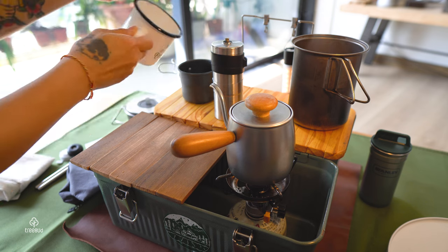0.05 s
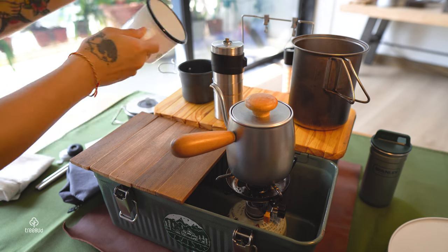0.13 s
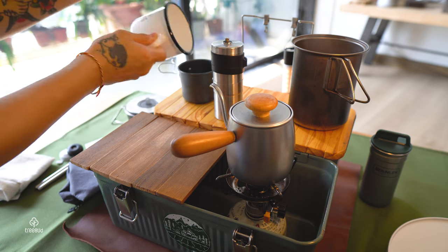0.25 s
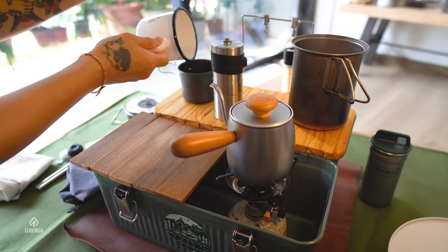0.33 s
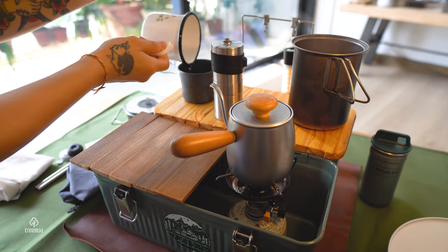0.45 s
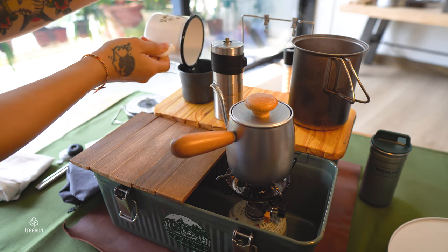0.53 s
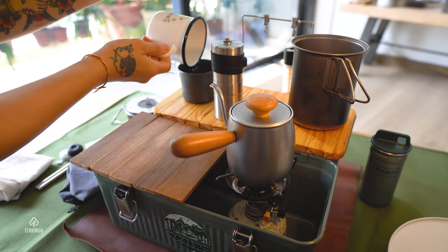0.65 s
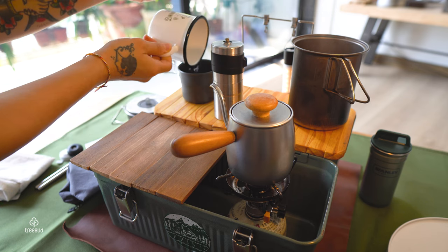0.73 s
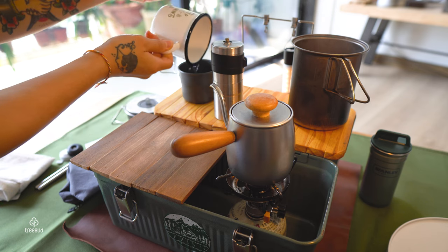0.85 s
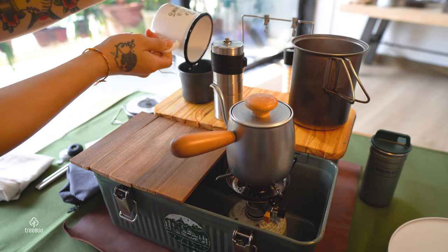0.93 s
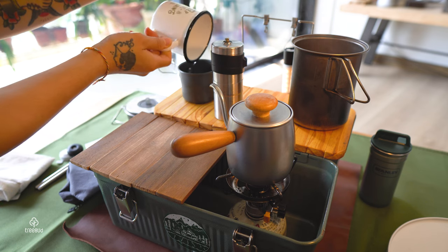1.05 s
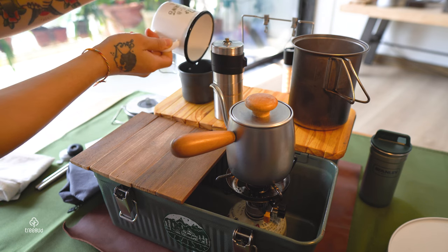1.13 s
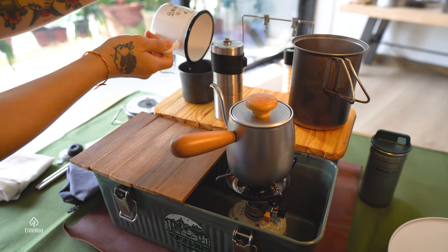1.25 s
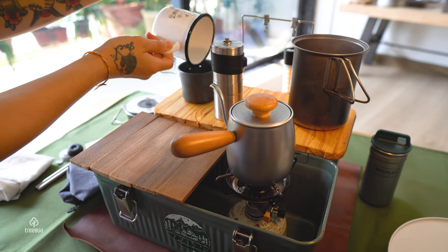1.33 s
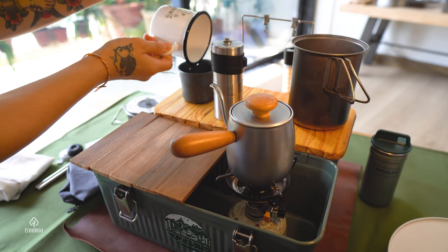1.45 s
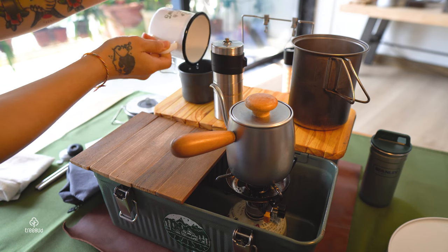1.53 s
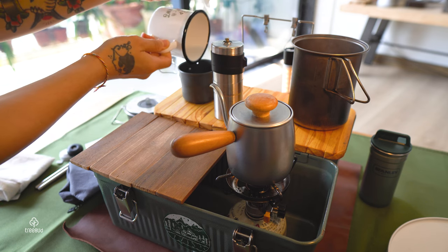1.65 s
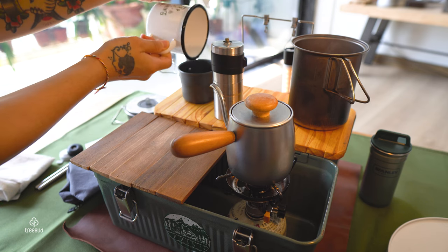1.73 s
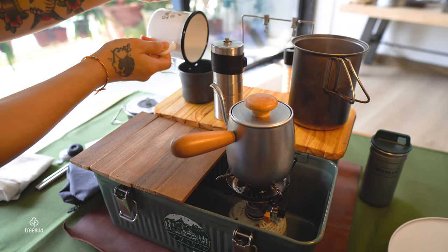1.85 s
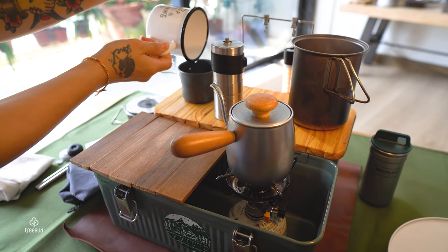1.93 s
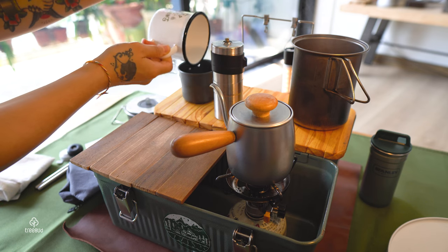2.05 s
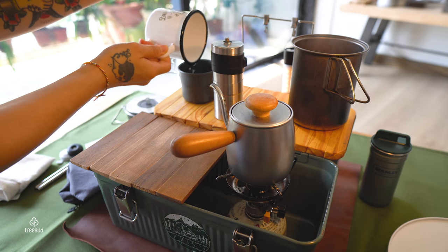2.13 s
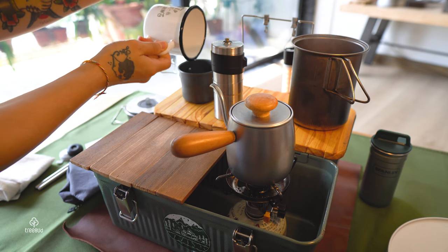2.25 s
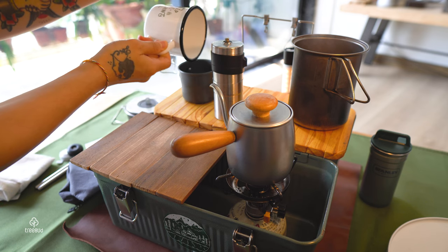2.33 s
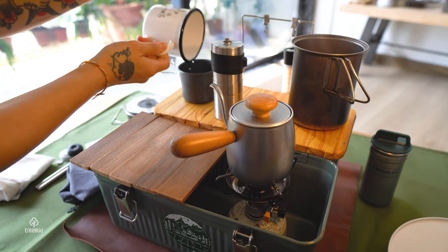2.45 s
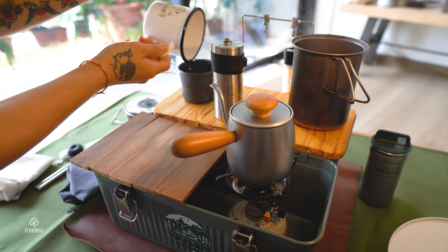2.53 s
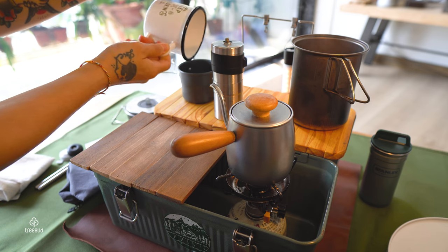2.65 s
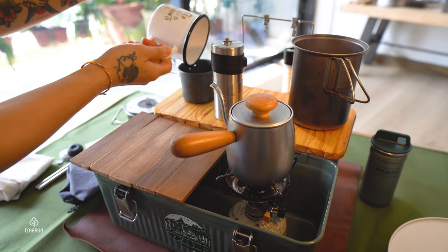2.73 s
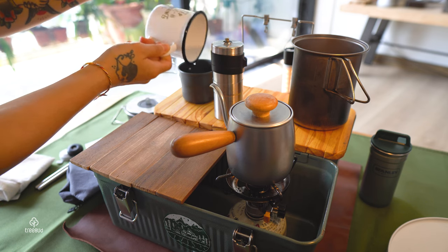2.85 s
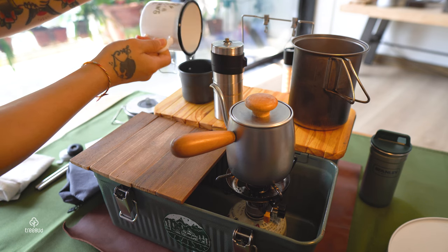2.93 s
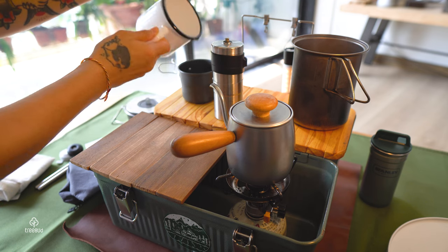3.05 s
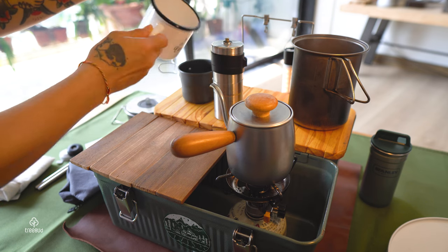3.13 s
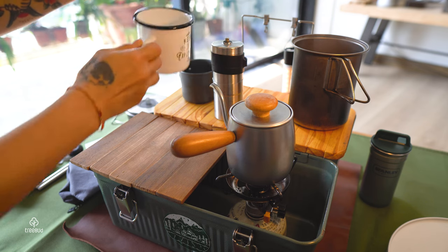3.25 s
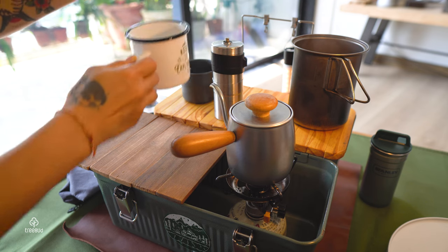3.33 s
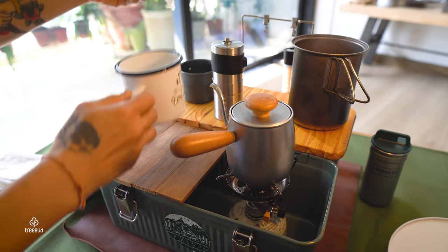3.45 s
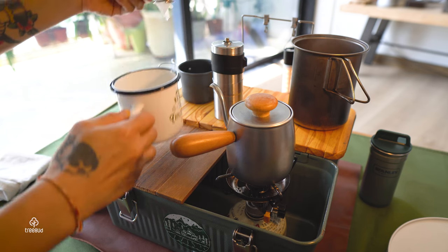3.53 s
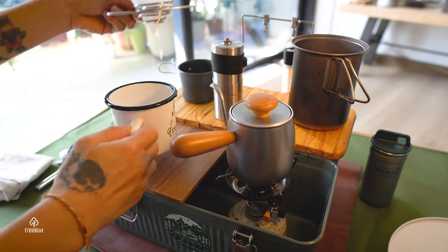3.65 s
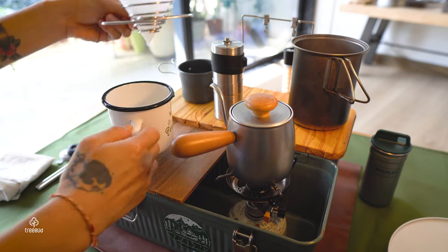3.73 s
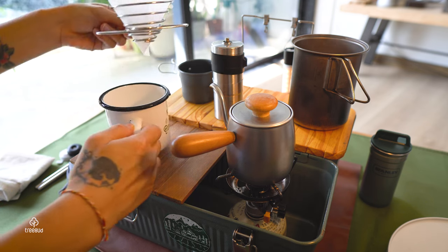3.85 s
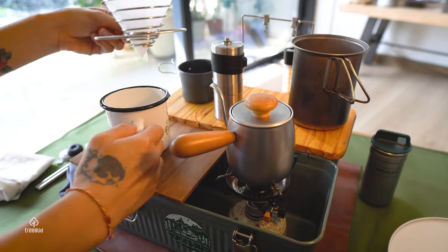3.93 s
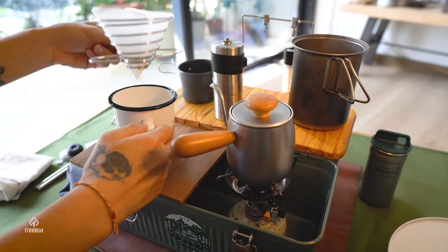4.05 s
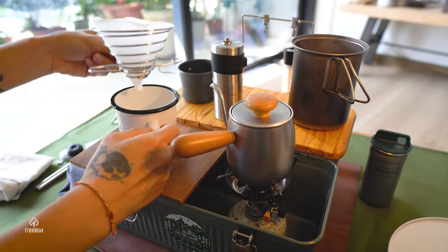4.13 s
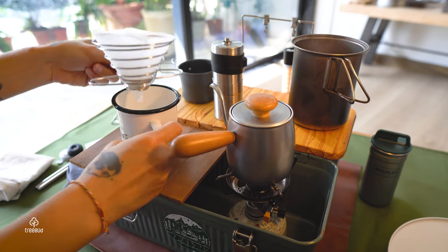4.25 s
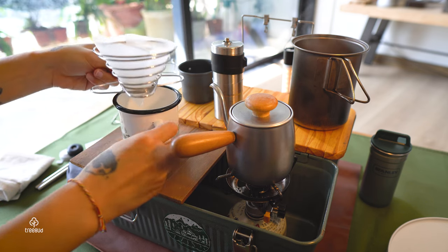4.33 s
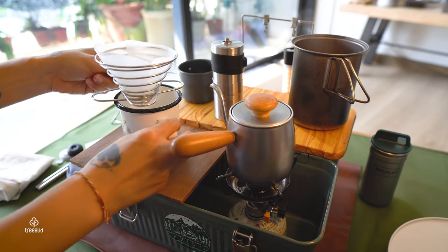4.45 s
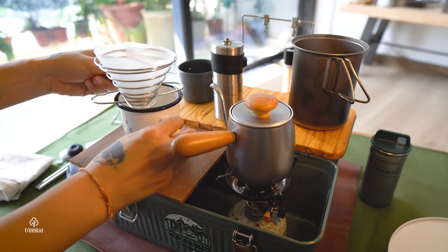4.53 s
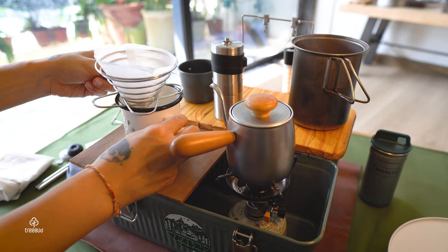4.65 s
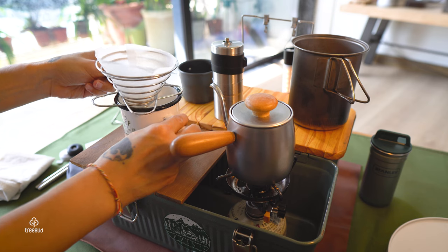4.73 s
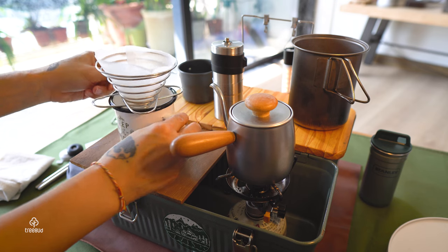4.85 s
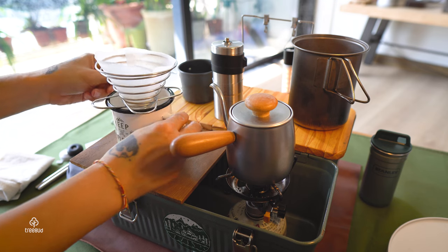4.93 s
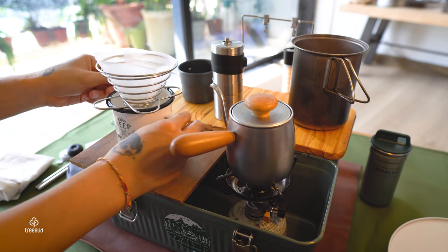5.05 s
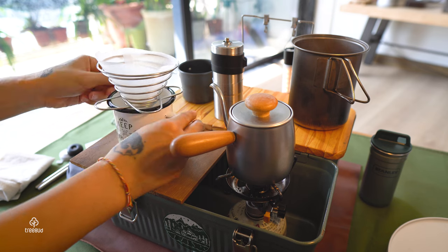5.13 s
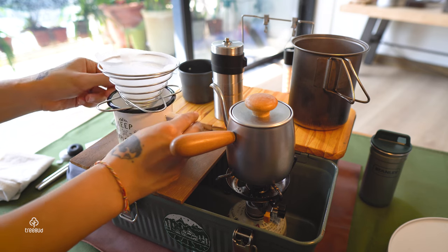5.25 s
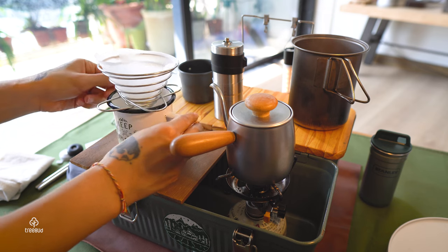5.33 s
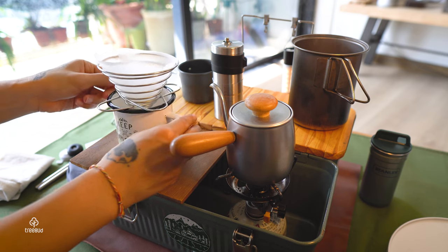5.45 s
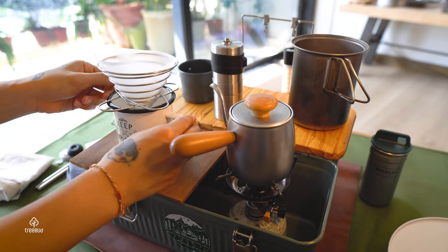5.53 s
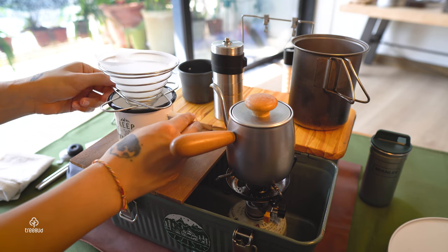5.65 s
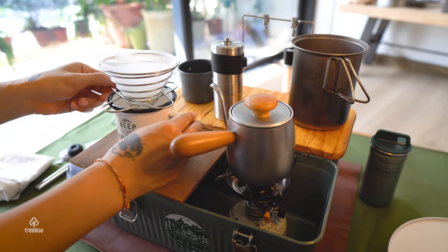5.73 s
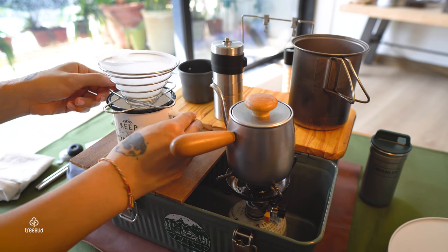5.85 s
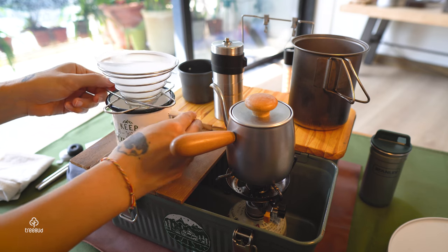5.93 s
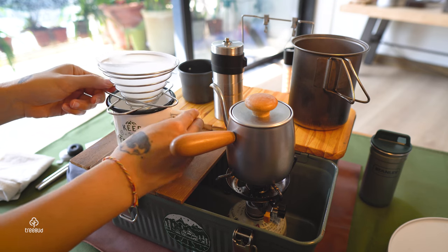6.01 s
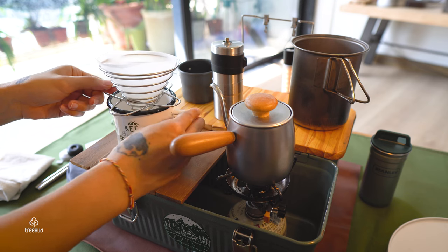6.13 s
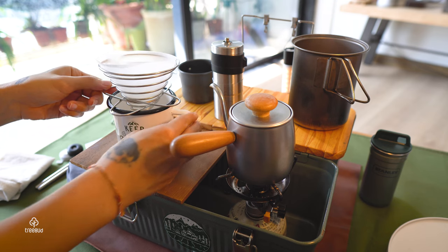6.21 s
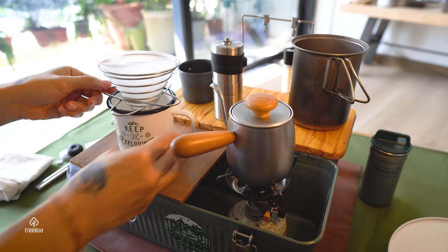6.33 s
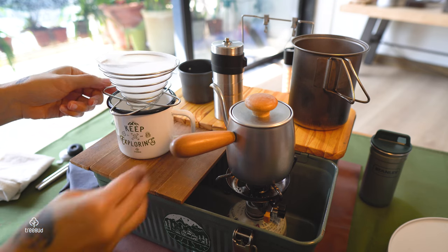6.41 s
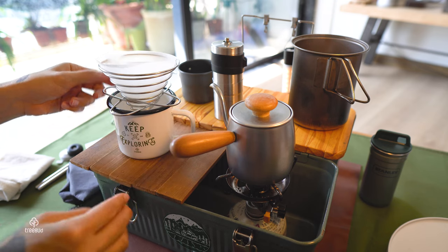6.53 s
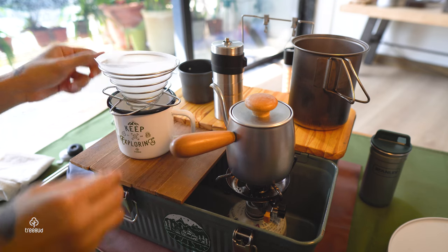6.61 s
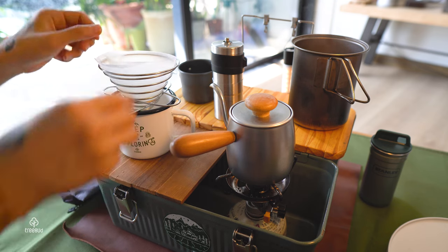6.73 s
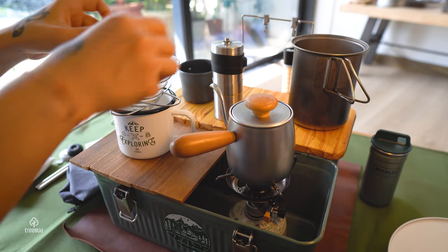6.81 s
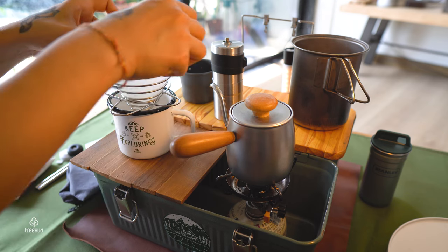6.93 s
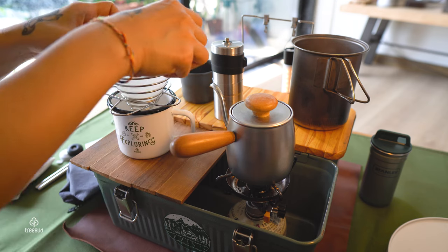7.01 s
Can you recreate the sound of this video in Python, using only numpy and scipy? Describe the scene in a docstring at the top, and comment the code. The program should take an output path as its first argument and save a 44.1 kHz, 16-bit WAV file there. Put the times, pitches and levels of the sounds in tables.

```python
"""A small, humming room: a gas burner murmurs under a pot while an enamel mug is tipped over a cup.
The rim clinks and the last drops fall out; the mug is set on the wooden lid of a steel box in two knocks,
then a wire dripper rattles into place on it. Struck bodies are sums of decaying modes over a noise wash;
drops, rubs, squeak and burner are coloured noise, bumps are low sines and the hum is resonant noise.
Near reflections and a diffuse tail place all but the background in the room."""
import sys
import numpy as np
from scipy import signal
from scipy.fft import rfft, irfft
from scipy.io import wavfile
from scipy.ndimage import uniform_filter1d

SR = 44100
rng = np.random.default_rng(int(sys.argv[2]) if len(sys.argv) > 2 else 0)


def file_out(sig):
    """Save sig as 16-bit WAV at sys.argv[1]."""
    # one column per channel
    cols = np.atleast_2d(sig).T
    # limit, then scale
    lim = np.clip(cols, -1, 1)
    pcm = np.round(lim * 32767).astype(np.int16)
    wavfile.write(sys.argv[1], SR, pcm)


N = 312228
TIME = np.arange(N) / SR
RING = np.arange(int(.6 * SR)) / SR  # time axis of one short sound [s]


def from_db(db):
    """Decibels to gain."""
    return 10 ** (np.asarray(db) / 20)


def rms_one(x):
    """Scale to unit rms."""
    return x / np.sqrt(np.mean(x ** 2) + 1e-20)


def at_hz(points, hz):
    """Read a table on a log-frequency axis."""
    f, value = np.transpose(points)
    return np.interp(np.log(np.maximum(hz, 1)), np.log(f), value)


def fade(t60):
    """Exponential decay that falls 60 dB in t60 seconds."""
    return np.exp(-np.log(1000) * RING / t60)


def bins(size):
    """Frequencies of a real FFT [Hz]."""
    return np.arange(size // 2 + 1) * SR / size


def noise(spectrum, size):
    """Random-phase noise of the given colour, rms 1."""
    phase = np.exp(2j * np.pi * rng.random(size // 2 + 1))
    magnitude = from_db(at_hz(spectrum, bins(size)))
    return rms_one(irfft(phase * magnitude, size))


def add(out, s, sound):
    """Mix a sound in from time s."""
    i = int(round(s * SR))
    out[i:i + len(sound)] += sound[:N - i]


def stroke(start, length, attack_s, release_s):
    """Envelope of a sliding touch: it swells, holds and dies away."""
    swell = np.clip((TIME - start) / attack_s, 0, 1)
    return swell * np.exp(-np.maximum(TIME - start - length, 0) / release_s)


def contact(sound, brightness, pivot_hz):
    """A harder contact lifts the treble and thins the bass about a pivot."""
    low = signal.sosfilt(signal.butter(1, pivot_hz, fs=SR, output="sos"), sound)
    high = sound - low
    return low * from_db(-2 * brightness) + high * from_db(2 * brightness)


def struck(hits, modes, dense, pivot_hz, low_hz, attack_s, modes_db, crack_db, crack_t60, dense_db, dense_t60):
    """Two rows: the clear modes of the spot struck, and a short crack with its wash of close modes."""
    clear, wash, dense = np.zeros(N), np.zeros(N), np.array(dense)
    press = 1 - np.exp(-(RING / attack_s) ** 2)  # the contact force takes a moment to build
    crack = from_db(crack_db) * fade(crack_t60)
    envelope = np.hypot(crack, from_db(dense_db) * fade(dense_t60))
    for s, level_db, brightness, spot in hits:
        spot = int(spot)
        burst = noise(dense[:, [0, spot + 1]], len(RING)) * envelope
        tones = np.zeros(len(RING))
        for k, (hz, t60, *spot_db) in enumerate(modes):
            sign = (-1) ** k  # neighbouring modes start in opposite directions
            gain = sign * from_db(modes_db + spot_db[spot])
            tones += gain * np.sin(2 * np.pi * hz * RING) * fade(t60)
        add(clear, s, from_db(level_db) * contact(press * tones, brightness, pivot_hz))
        add(wash, s, from_db(level_db) * contact(press * burst, brightness, pivot_hz))
    # a small body radiates little bass
    return signal.sosfilt(signal.butter(4, low_hz, "high", fs=SR, output="sos"), [clear, wash])


def mug_on_lid():
    """The mug lands on the lid: low modes ring under a hard, very short crack."""
    # knocks: (time [s], relative level [dB], brightness [2 dB steps], spot [0-2])
    lid_hits = [(3.8310, -23.5, -3, 2), (3.9866, 5, -1.05, 0), (4.2020, -6.5, 2.5, 1),
                (4.2058, -4, -4.5, 1)]
    # clear modes of lid and mug: (frequency [Hz], t60 [s], relative level at spots 0, 1, 2 [dB each])
    lid_modes = [(250, 0.1, -24, -19, -30), (345, 0.12, -20, -21, -24), (416, 0.15, -13, -17, -22),
                 (480, 0.1, -15, -19, -24), (576, 0.12, -17, -18, -25), (650, 0.13, -19, -16, -27),
                 (701, 0.17, -18, -17, -35), (770, 0.13, -17, -22, -31), (1078, 0.16, -17, -26, -47),
                 (1182, 0.17, -15, -22, -46), (1232, 0.24, -17, -29, -56), (1528, 0.18, -21, -22, -49),
                 (1701, 0.22, -22, -35, -53), (1790, 0.15, -29, -27, -54), (1857, 0.15, -30, -31, -53),
                 (1949, 0.16, -23, -40, -60), (2293, 0.15, -27, -33, -44), (2730, 0.13, -38, -30, -44),
                 (2940, 0.13, -29, -26, -40), (3125, 0.16, -25, -32, -35), (3230, 0.13, -23, -36, -40),
                 (3370, 0.13, -23, -35, -50), (3930, 0.13, -44, -29, -46), (5530, 0.1, -37, -44, -40)]
    # colour of the many weak, close modes: (frequency [Hz], relative level at spots 0, 1, 2 [dB each])
    lid_dense = [(130, -26, -22, -22), (260, -12, -4, -16), (410, -3, 2, 1), (740, -5, 1, -2),
                 (960, -17, -17, -16), (1180, -5, -8, -20), (1400, -11, -8, -24), (1850, -2, -5, -26),
                 (2620, -14, -17, -10), (3130, 2, -10, 2), (4200, -19, -16, -18), (5400, -13, -19, -9),
                 (8500, -32, -33, -26), (15500, -42, -47, -40)]
    return struck(lid_hits, lid_modes, lid_dense, pivot_hz=1216, low_hz=250, attack_s=.0004,
                  modes_db=-5.0, crack_db=0, crack_t60=.011, dense_db=-28, dense_t60=.2)


def dripper_on_mug():
    """The wire cone rattles on the mug: stiff wires ring in many high modes."""
    # rattles: (time [s], relative level [dB], brightness [2 dB steps], spot [0-2])
    wire_hits = [(4.7068, -1.5, -0.1, 0), (4.7797, 0, 0.6, 1), (4.8360, -11.5, -1.5, 1),
                 (4.8474, -6.5, 0.4, 1), (4.9815, -7.5, -1.4, 2), (4.9928, -6.5, -2, 2)]
    # clear modes of cone and mug: (frequency [Hz], t60 [s], relative level at spots 0, 1, 2 [dB each])
    wire_modes = [(415, 0.11, -32, -57, -48), (900, 0.08, -35, -31, -46), (1020, 0.1, -35, -38, -43),
                  (1300, 0.08, -47, -37, -30), (1545, 0.12, -38, -35, -37), (1680, 0.08, -36, -39, -51),
                  (2950, 0.13, -56, -31, -52), (3120, 0.12, -51, -51, -35), (3332, 0.17, -50, -48, -34),
                  (3728, 0.14, -37, -38, -38), (3930, 0.06, -40, -26, -43), (4014, 0.27, -31, -38, -44),
                  (4312, 0.18, -49, -55, -47), (4600, 0.35, -41, -53, -56), (5626, 0.09, -50, -39, -45),
                  (6480, 0.06, -48, -33, -49), (6923, 0.15, -42, -41, -42), (7031, 0.22, -43, -52, -43),
                  (7574, 0.12, -31, -33, -51), (7780, 0.1, -44, -35, -45), (8021, 0.22, -52, -57, -44),
                  (8166, 0.18, -46, -46, -43), (8475, 0.16, -38, -31, -38), (8969, 0.09, -26, -35, -50),
                  (9399, 0.07, -29, -31, -44), (10170, 0.06, -27, -30, -37), (10380, 0.1, -32, -47, -52),
                  (10980, 0.07, -28, -50, -48), (11150, 0.065, -30, -41, -45),
                  (11500, 0.045, -28, -33, -38), (12250, 0.09, -39, -22, -38), (12780, 0.06, -26, -24, -37),
                  (12900, 0.06, -24, -22, -39), (12980, 0.07, -28, -20, -42), (13275, 0.1, -31, -28, -41),
                  (14000, 0.085, -33, -29, -47), (14120, 0.1, -45, -28, -48), (14230, 0.07, -33, -38, -43),
                  (15270, 0.1, -33, -42, -54), (15620, 0.06, -37, -31, -49)]
    # colour of the many weak, close modes: (frequency [Hz], relative level at spots 0, 1, 2 [dB each])
    wire_dense = [(200, -20, -26, -25.5), (398, 9.5, -16, 3), (680, -18, -16, -25), (948, -10.5, -5, 3),
                  (1570, 6.5, -4, 6), (2200, -22, -11, -33), (3150, -2.5, -3, 7), (4000, -15.5, -9.5, -8),
                  (4600, -11, -7.5, -13), (6900, -5, -2, 3), (10100, 2.5, 1, 2.5), (13300, 0.5, 6, 9),
                  (14460, -8, -6.5, -11), (15940, -8, -13, -6)]
    return struck(wire_hits, wire_modes, wire_dense, pivot_hz=6000, low_hz=250, attack_s=.0002,
                  modes_db=2.0, crack_db=-17, crack_t60=.03, dense_db=-29.5, dense_t60=.11)


def rim_on_cup():
    """The mug rim clinks on the cup: the modes of both ring over a faint wash."""
    # clink: (time [s], relative level [dB], brightness [2 dB steps], spot [0])
    rim_hits = [(0.6460, 0, 1, 0)]
    # clear modes of mug and cup: (frequency [Hz], t60 [s], relative level [dB])
    rim_modes = [(1529, 0.16, -19.5), (2503, 0.13, -11.5), (2762, 0.2, -36), (3138, 0.22, -22),
                 (3381, 0.13, -28), (3526, 0.16, -27), (3570, 0.12, -28), (3783, 0.2, -23),
                 (4334, 0.19, -43), (5577, 0.12, -41), (5725, 0.09, -35), (6912, 0.17, -39),
                 (7773, 0.2, -46), (8290, 0.17, -44), (9010, 0.12, -43), (9286, 0.1, -45),
                 (10090, 0.12, -46), (12090, 0.1, -47), (12660, 0.09, -43)]
    # colour of the many weak, close modes: (frequency [Hz], relative level [dB])
    rim_dense = [(300, -14), (700, -8.5), (1400, 1), (1900, -5.5), (2400, -7), (3600, 8.5), (4500, -15),
                 (5400, -6), (6300, -16.5), (8400, -7.5), (10000, -14), (15500, -20)]
    return struck(rim_hits, rim_modes, rim_dense, pivot_hz=3000, low_hz=201, attack_s=.0003,
                  modes_db=-1.8, crack_db=-25, crack_t60=.03, dense_db=-27.5, dense_t60=.12)


def spray(count):
    """Tiny droplets at random moments while the mug drains, as rows like those of the drops."""
    start_s, length_s, centre_hz, t60 = .63, .25, 12100, .01
    rows = []
    for k, (when, size, pitch) in enumerate(rng.random((count, 3))):
        s = start_s + length_s * (k + when) / count
        level_db = -52.5 + 5 * (2 * size - 1)
        hz = centre_hz * 2 ** (.35 * (2 * pitch - 1))  # up to .35 octave either way
        rows.append((s, level_db, hz, t60))
    return rows


def drops(spread, skirt_db, attack_s):
    """A drop bursts into a few tiny bubbles of nearly one pitch, on a faint splash: narrow noise."""
    # clearest drops landing in the cup: (time [s], level [dB], pitch [Hz], t60 [s])
    clear_drops = [(0.6705, -36, 11400, .012), (0.7950, -37, 7070, 0.013), (0.8312, -39, 10170, 0.011),
                   (0.9580, -39, 3800, 0.03), (0.9760, -47, 3900, 0.099), (0.9938, -37, 9330, 0.0068),
                   (1.0, -41, 12700, 0.028), (1.0109, -32.5, 5580, 0.044), (1.0318, -20, 9400, 0.0038),
                   (1.031, -30.5, 13700, 0.014), (1.0508, -34, 7160, 0.0062)]
    out = np.zeros(N)
    for s, level_db, hz, t60 in list(clear_drops) + spray(count=6):
        skirts = [(hz / (1 + spread), skirt_db), (hz, 0), (hz * (1 + spread), skirt_db)]
        colour = [(hz / 3, -45), *skirts, (hz * 3, -45)]
        envelope = fade(t60) * np.minimum(RING / attack_s, 1)
        add(out, s, from_db(level_db) * noise(colour, len(RING)) * envelope)
    return out


def bumps():
    """Dull knocks while the mug is held: low sines that swell softly, then decay."""
    # handling bumps: (time [s], level before the soft onset [dB], frequency [Hz], t60 [s])
    soft_bumps = [(1.217, -37, 248.7, 0.24), (1.2420, -38.5, 457, 0.088)]
    out = np.zeros(N)
    for s, level_db, hz, t60 in soft_bumps:
        envelope = fade(t60) - fade(.014)
        add(out, s, from_db(level_db) * np.sin(2 * np.pi * hz * RING) * envelope)
    return out


def slide(grain_db):
    """Mug, then wire, are nudged into place: short rubs of noise with an uneven grain."""
    # rubs: (start [s], length [s], level before the grain [dB])
    nudges = [(4.29, 0.27, -73), (5.19, 0.2, -72.5), (5.55, 0.042, -74), (5.683, 0.11, -72.5),
              (5.873, .025, -73), (6.02, .07, -68), (6.094, .07, -69.5)]
    # colour of the rubbing: (frequency [Hz], relative level [dB])
    rub_colour = [(2000, -17.5), (3200, 3.5), (4200, -3.5), (5100, -11.5), (6150, 2), (6900, -17),
                  (8000, -11), (10000, -17.5), (13000, -13), (16000, -19.5)]
    grain = rms_one(uniform_filter1d(rng.standard_normal(N), size=400))
    pressure = np.zeros(N)
    for start, length, level_db in nudges:
        pressure += from_db(level_db) * stroke(start, length, attack_s=.03, release_s=.04)
    return pressure * from_db(grain_db * grain) * noise(rub_colour, N)


def squeak(attack_s, release_s):
    """The grip slips once: skin on enamel gives a thin, unsteady tone, made of narrow noise."""
    # slip: (start [s], length [s], level [dB], pitch [Hz])
    slips = [(3.458, .06, -73, 4460)]
    out = np.zeros(N)
    for start, length, level_db, hz in slips:
        colour = [(hz * .93, -60), (hz, 0), (hz * 1.07, -60)]
        out += from_db(level_db) * stroke(start, length, attack_s, release_s) * noise(colour, N)
    return out


def room(x, echo_db, tail_db, onset_s):
    """A few near reflections, and a diffuse tail that builds up and dies band by band."""
    # near reflections: (delay after the direct sound [s], relative gain [dB])
    reflections = [(.0032, -14.5), (0.0185, -19), (0.0236, -16.5), (0.0282, -19), (.0335, -18),
                   (0.041, -22)]
    # room decay: (frequency [Hz], t60 [s])
    decay_times = [(200, 0.38), (800, 0.35), (2500, 0.39), (7000, 0.31), (15000, 0.18)]
    size = len(RING)
    white, response = rfft(rng.standard_normal(size)), np.zeros(size)
    edges = [0, 350, 1000, 2500, 5000, 10000, SR / 2]  # [Hz]
    for low, high in zip(edges, edges[1:]):
        band = (bins(size) >= low) & (bins(size) < high)
        response += irfft(white * band, size) * fade(at_hz(decay_times, (low + high) / 2))
    response *= np.minimum(RING / onset_s, 1) ** 2
    response *= from_db(tail_db) / np.sqrt(np.sum(response ** 2))
    for delay, gain_db in reflections:
        response[int(delay * SR)] += from_db(gain_db + echo_db)
    return signal.fftconvolve(x, response)[:N]


def in_room(body, ring_wet_db, echo_db, tail_db, onset_s, dull_hz):
    """The crack fills the room, which returns it duller; the clear ringing is heard mostly direct."""
    clear, wash = body
    absorption = signal.butter(1, dull_hz, fs=SR, output="sos")
    sent = signal.sosfilt(absorption, wash + from_db(ring_wet_db) * clear)
    return clear + wash + room(sent, echo_db, tail_db, onset_s)


def background(burner_db):
    """Steady noise of burner and room air over a low, wavering hum of resonant noise."""
    # colour of burner and room air: (frequency [Hz], relative level [dB])
    burner_colour = [(20, -0.5), (30, 4), (40, -11.5), (80, -9.5), (140, -7), (180, -10), (230, -11),
                     (330, -16), (500, -20.5), (720, -21.5), (1050, -16.5), (1400, -28.5), (2200, -39),
                     (4200, -43), (5500, -49), (8000, -54.5), (15500, -58)]
    # room hum: (frequency [Hz], width [Hz], level [dB])
    hum_bands = [(58.4, 8.1, -48), (109.3, 6.8, -49.5)]
    out = from_db(burner_db) * noise(burner_colour, N)
    for hz, width, level_db in hum_bands:
        resonance = 1 / (1 + (2 * (bins(N) - hz) / width) ** 2)
        hum = irfft(rfft(rng.standard_normal(N)) * resonance, N)
        out += from_db(level_db) * rms_one(hum)
    return out


def scene():
    """The three struck bodies and the small sounds, each with its share of the room, over the background."""
    out = in_room(mug_on_lid(), ring_wet_db=-5.5, echo_db=-3, tail_db=-8, onset_s=.025, dull_hz=4480)
    out += in_room(dripper_on_mug(), ring_wet_db=-4.0, echo_db=-6.0, tail_db=-8.5, onset_s=.0121, dull_hz=13000)
    out += in_room(rim_on_cup(), ring_wet_db=-8.5, echo_db=-1.5, tail_db=-5.5, onset_s=.0072, dull_hz=14100)
    small = drops(spread=.15, skirt_db=-25, attack_s=.00043) + bumps()
    small += slide(grain_db=2.0) + squeak(attack_s=.02, release_s=.025)
    out += small + room(small, echo_db=-6, tail_db=-10.5, onset_s=.015)
    out += background(burner_db=-44.5)
    return out[None]


def record(dry):
    """Microphone input: peaks beyond its limit clip, then a steep low-pass cuts the top at 16.2 kHz."""
    clipped = np.clip(dry, -.97, .97)
    return signal.sosfilt(signal.ellip(10, .2, 80, 16200, fs=SR, output="sos"), clipped)


dry = scene()
out = record(dry)
file_out(out)
```